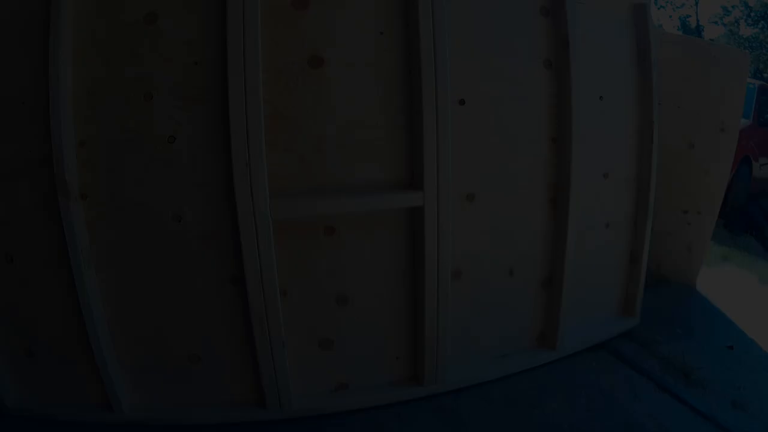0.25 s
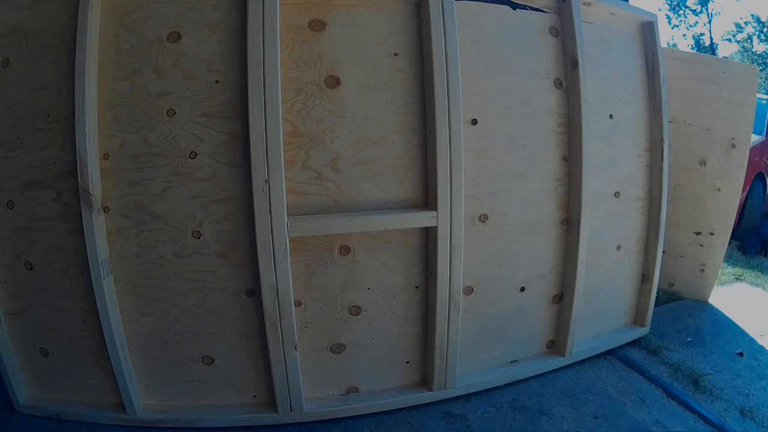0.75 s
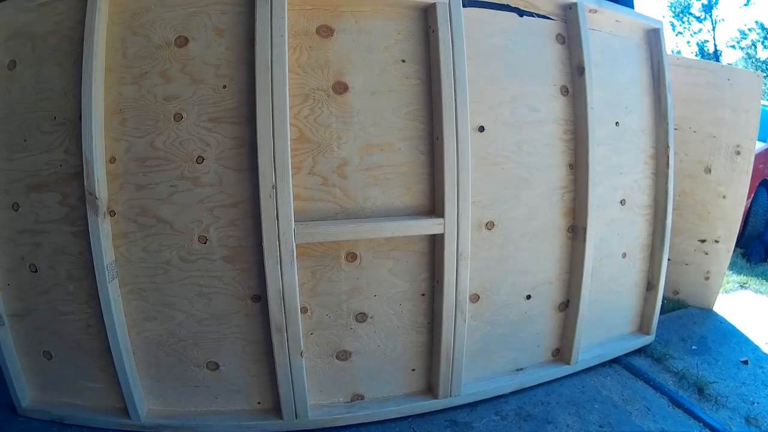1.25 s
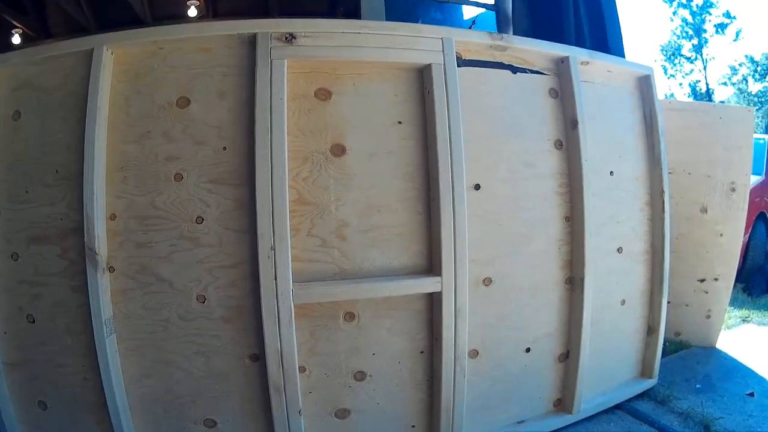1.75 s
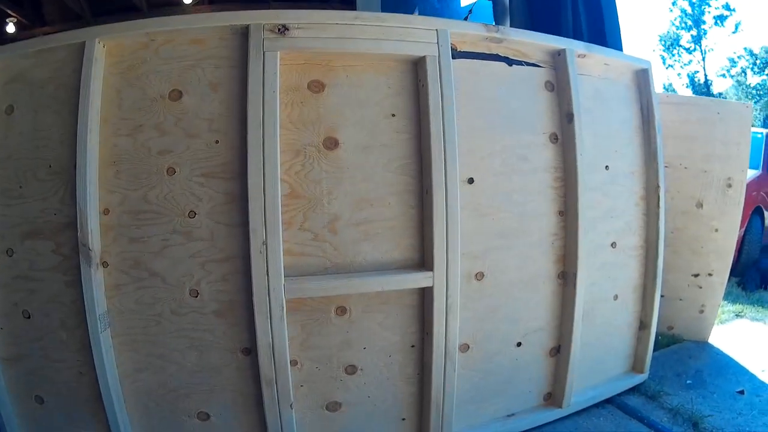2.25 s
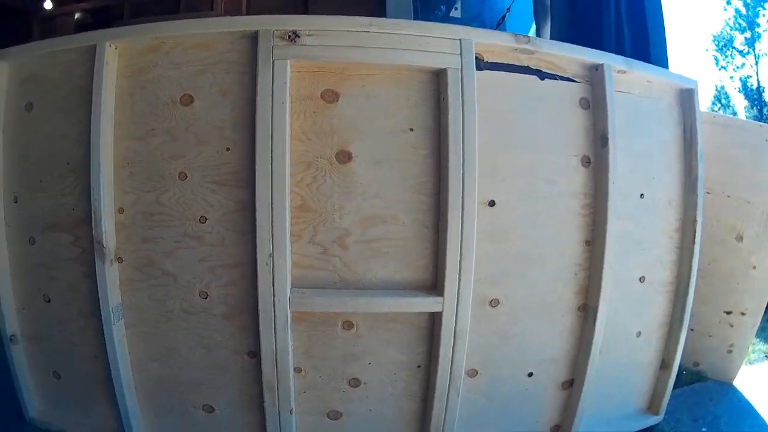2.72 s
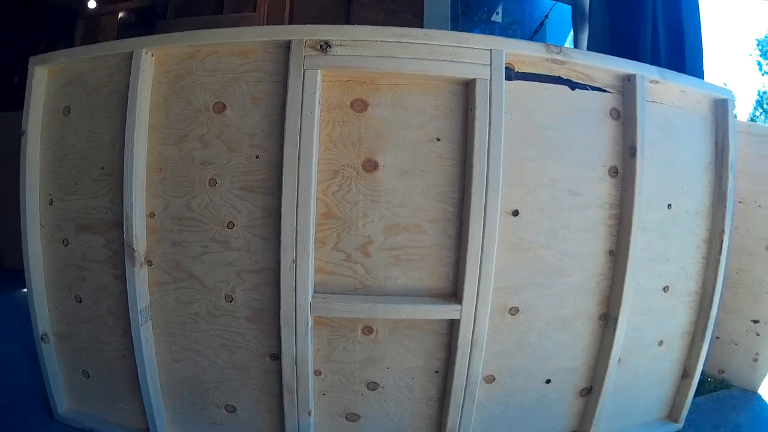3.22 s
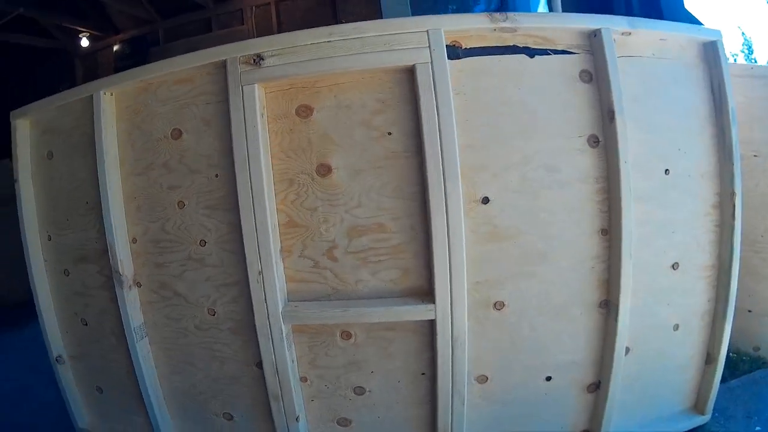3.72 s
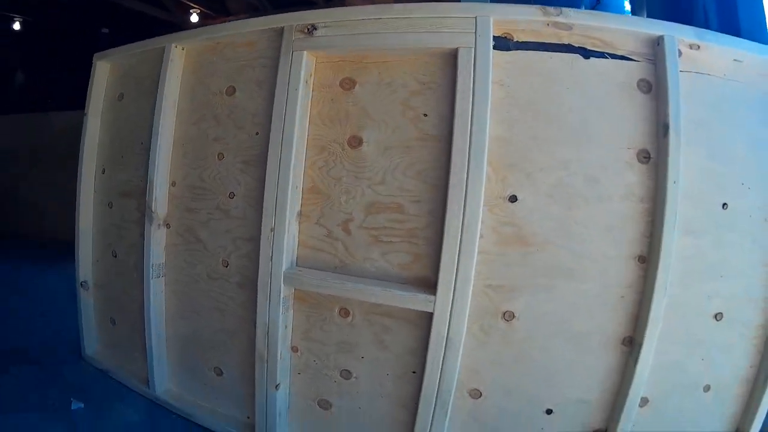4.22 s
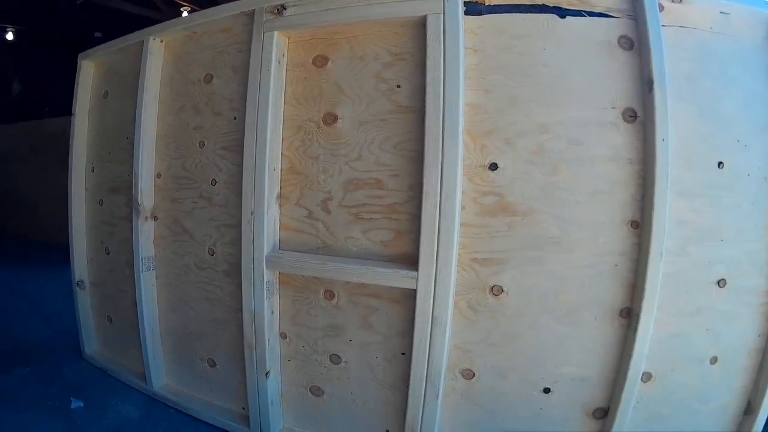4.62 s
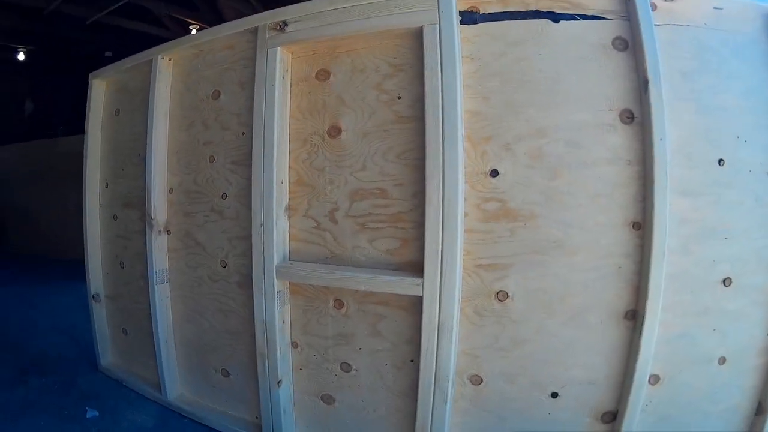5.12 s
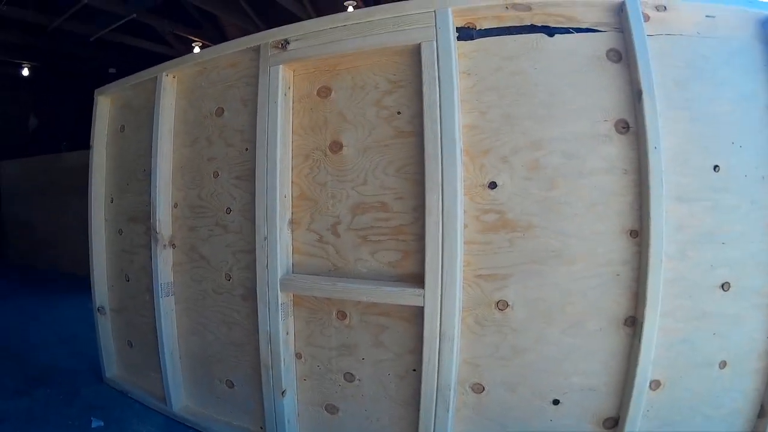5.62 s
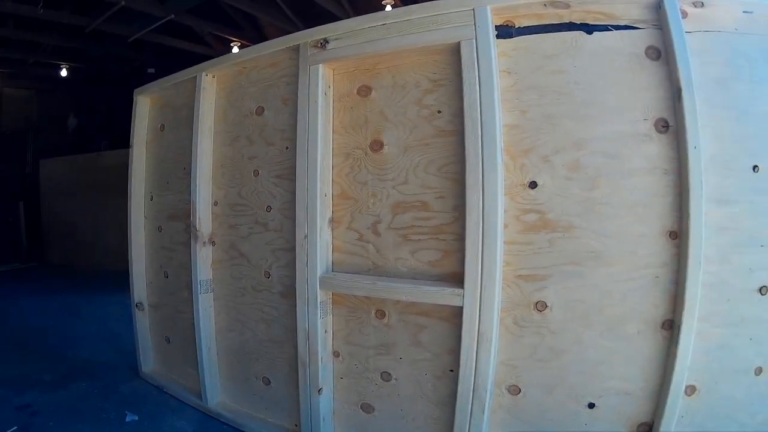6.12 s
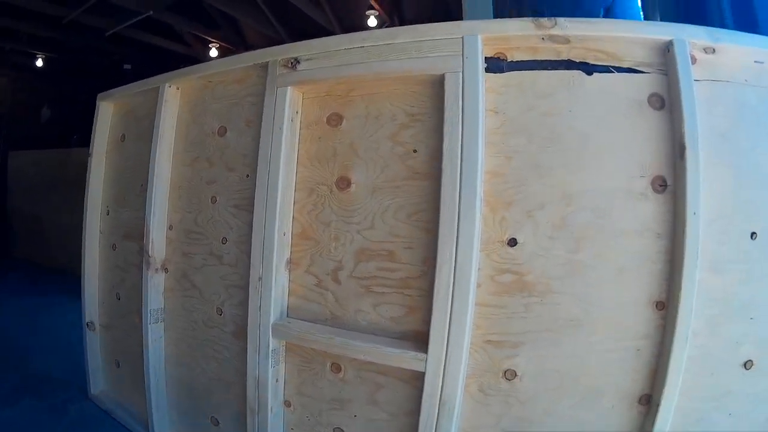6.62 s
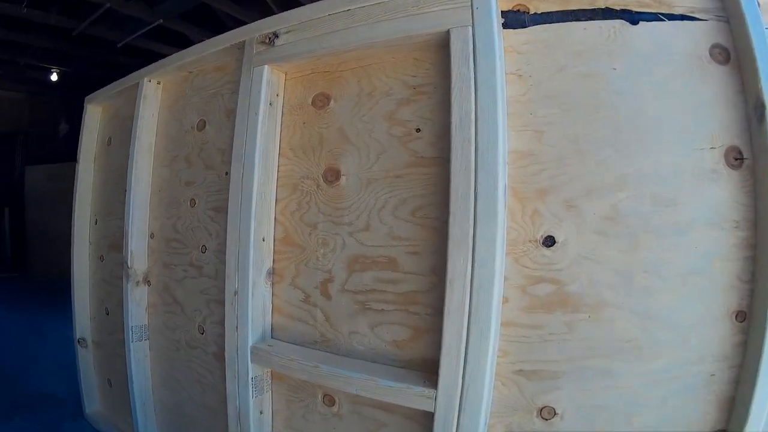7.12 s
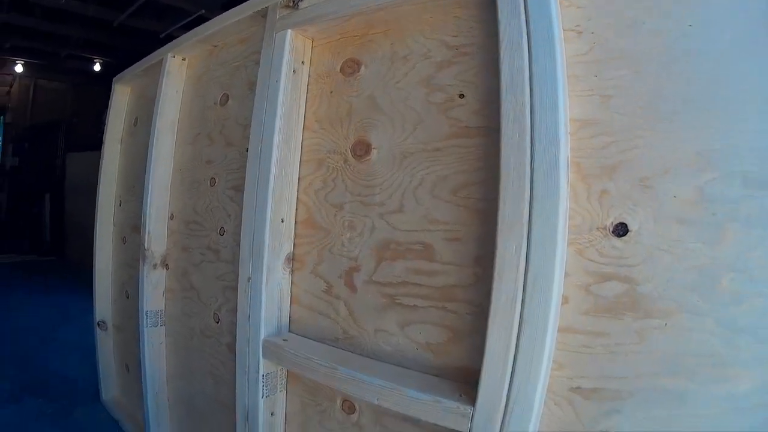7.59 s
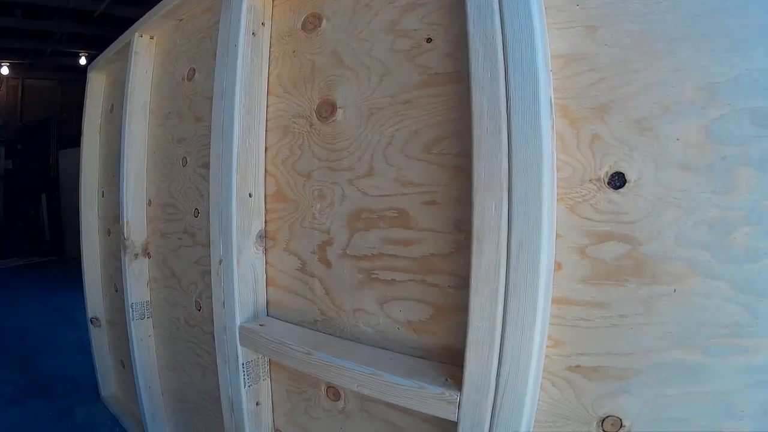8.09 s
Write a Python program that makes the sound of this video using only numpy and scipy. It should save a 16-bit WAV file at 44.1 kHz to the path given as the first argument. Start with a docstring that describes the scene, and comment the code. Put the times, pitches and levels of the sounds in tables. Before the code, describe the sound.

A small camera's plastic housing is knocked, tapped and rubbed in uneven clusters, with heavy close thumps over faint outdoor air and thin hiss.

```python
"""Handling noise of a small camera carried along a plywood wall frame in an open garage, 8.35 s.
0-1.2 s: air, rumble and hiss sink to silence at 0.17 s, then fade in with a thin whine, barely there
before; first knocks and sways.
1.2-2.5 s: dense knocks on the plastic housing, the hardest clipping the input; then sparse, scuffs near 3.9 s.
4.4-6.3 s: knocks, sliding rubs with rattles and mount sways return, one hard blow at 5.86 s.
6.3-8.35 s: light rubs and scuffs over thinner air, then a last cluster of knocks from 7.5 s."""
import sys
import numpy as np
from scipy import signal
from scipy.fft import rfft, irfft
from scipy.io import wavfile

SR = 44100
rng = np.random.default_rng(int(sys.argv[2]) if len(sys.argv) > 2 else 0)


def pcm_store(signal):
    """Save signal as 16-bit PCM."""
    levels = np.round(np.clip(np.atleast_2d(signal), -1, 1) * 32767)
    wavfile.write(sys.argv[1], SR, levels.astype(np.int16).T)


N = 368235

# Outdoor air level, before waver and opening fade: time_s, level_db
AIR_LEVEL = [(1.0, -47), (1.18, -47.5), (1.65, -50.5), (2.41, -48), (2.78, -52.5), (3.95, -53), (4.11, -51),
             (4.79, -46), (5.09, -53), (6.67, -58), (7.06, -62), (7.61, -61.5), (7.84, -56.5),
             (7.94, -57.5), (8.19, -61), (8.35, -67.5)]
# Outdoor air spectrum: freq_hz, density_db (per Hz, relative)
AIR_SPECTRUM = [(20, -18), (60, -0.5), (100, -0.5), (160, -6), (230, 2), (380, -3.5), (650, -5),
                (920, -0.5), (1290, 1.5), (1650, -5), (2300, -13), (3200, -24), (5000, -29.5), (9000, -38)]
# Low rumble spectrum: freq_hz, density_db (per Hz, relative)
RUMBLE_SPECTRUM = [(20, -8.5), (60, -1.5), (100, -1.5), (180, -10.5), (500, -33), (2000, -70)]
# Electronic hiss spectrum: freq_hz, density_db (per Hz, relative)
HISS_SPECTRUM = [(100, 13), (3000, 2.5), (6000, 0.5), (9000, 0), (13000, 1), (15600, -2), (16100, -24.5)]
# Scuff friction spectrum: freq_hz, density_db (per Hz, relative)
SCUFF_SPECTRUM = [(150, -20), (280, -4), (460, 3.5), (800, 3), (1400, 2), (2000, 1), (2600, 0),
                  (4000, -7.5), (6000, -15), (8000, -26), (12500, -16.5), (16000, -30.5)]
# Scuffs, each swelling and dying away: peak_s, level_db, rise_s, fall_s
SCUFF_EVENTS = [(3.83, -61, .02, 0.13), (3.942, -46, 0.017, 0.2), (3.994, -43.5, 0.012, 0.026),
                (6.595, -55, 0.02, 0.04), (7.33, -65.5, 0.1, 0.081)]
# Bumps swaying the mount: start_s, level_db, sway_hz
BUMP_EVENTS = [(0.283, -35.5, 57), (0.392, -39.5, 60), (0.556, -29.5, 60), (.995, -36.5, 85),
               (1.298, -34.5, 127), (1.334, -19, 45.4), (1.551, -18.5, 116.5), (1.56, -30, 47.7),
               (2.001, -39, 69.4), (2.112, -38, 75), (4.455, -26, 66), (4.718, -24, 61), (4.761, -26.5, 72),
               (5.342, -28.5, 64), (5.856, -24.5, 118), (7.63, -24.5, 70), (7.747, -29, 68.4),
               (8.039, -24, 62)]
# Modes of housing and mount, before random spread and heavy damping: freq_hz, level_db, t60_s
HOUSING_MODES = [(143, -12, 0.046), (211, -6.5, 0.066), (289.6, -5.5, 0.069), (401.5, -6, 0.026),
                 (493, -9, 0.021), (605.5, -8, 0.02), (739, -7.5, 0.04), (852.6, 3.5, 0.014),
                 (983, -0.5, 0.017), (1245, -7.5, 0.041), (1447, -9.5, 0.03), (1662, -13, 0.049),
                 (1791, -5.5, 0.031), (2560, -8.5, 0.023), (3130, -16.5, 0.0027), (3683, -9, 0.033),
                 (4770, -4.5, 0.027), (4540, -24, 0.01), (5460, -27.5, 0.012)]
# Grip slides on the case: start_s, length_s, level_db, pitch_hz (favoured by the spot)
RUB_EVENTS = [(0.55, .12, -35.5, 1010), (1.15, .11, -55, 900), (2.118, 0.21, -40.5, 1400),
              (4.45, 0.069, -30, 1200), (4.736, 0.27, -35, 1290), (5.357, .11, -42, 1380),
              (5.86, 0.04, -19.5, 1290), (5.881, 0.16, -38, 1210), (6.576, .15, -39, 614),
              (6.717, 0.054, -45.5, 950), (6.77, .06, -49.5, 870), (7.648, .12, -27, 1570),
              (7.771, 0.087, -35.5, 1490), (8.03, .085, -31, 1090)]
# Stronger rattle taps are sharper: level_db, hardness (0-1)
TAP_HARDNESS = [(-48.5, .25), (-26.5, .65)]
# Knocks on the housing: start_s, level_db, pitch_hz (favoured by the spot),
# hardness (0 flesh - 1 sharp edge), chatter_s (decay)
KNOCK_EVENTS = [(.282, -33.5, 1070, 0.87, 0.0056), (.294, -27.5, 710, .75, 0.0016),
                (0.388, -50.5, 950, 0.89, 0.0059), (0.429, -41.5, 870, .05, 0.012),
                (.564, -35.5, 945, 0.36, 0.00078), (.59, -33, 1410, 0.16, 0.0018),
                (.668, -48.5, 1360, 0.76, .006), (.998, -43.5, 1080, 0.75, .0006),
                (1.011, -41.5, 940, 0.62, 0.0064), (1.166, -28, 1030, 0.52, 0.00045),
                (1.185, -33, 850, .05, 0.00039), (1.207, -38, 717, .06, .0005),
                (1.294, -27.5, 1070, .33, .0006), (1.3035, -13.5, 1060, 0.87, 0.0011),
                (1.323, -19.5, 895, 0.41, .0006), (1.336, -7.5, 1023, 0.83, 0.00086),
                (1.345, -20, 800, 0.3, .0004), (1.541, -34, 870, .05, .0013),
                (1.5513, -9, 650, 0.65, 0.00089), (1.765, -42.5, 800, .1, 0.0048),
                (1.991, -36, 1160, 0.72, 0.0014), (2.037, -42, 960, 0.61, .0006),
                (2.1126, -26, 1030, 0.46, .0005), (2.138, -35, 1140, 0.67, 0.00077),
                (2.19, -33, 1280, 0.31, 0.0038), (2.462, -54, 1800, 0.83, 0.0012),
                (4.461, -35.5, 1080, 0.99, 0.0011), (4.716, -21, 1070, 0.65, 0.00055),
                (4.729, -34, 1220, .62, .0006), (4.777, -26.5, 1280, 0.51, 0.00041),
                (4.816, -34.5, 1090, .25, 0.0033), (5.131, -29, 1200, 0.019, 0.00031),
                (5.345, -45.5, 910, 0.96, 0.0014), (5.361, -37, 1370, 0.52, .0047),
                (5.401, -38.5, 1010, 0.43, .002), (5.681, -49, 950, .45, .0006),
                (5.719, -28, 993, 0.43, 0.0011), (5.837, -30.5, 1000, 0.59, .002),
                (5.856, -11.5, 643, 0.73, 0.00062), (5.92, -32.5, 1560, 0.83, .0006),
                (5.936, -35.5, 1570, 0.72, 0.0044), (6.213, -26, 1170, 0.42, .0004),
                (6.305, -35, 980, .15, 0.0052), (6.685, -45, 1160, 0.6, .0012),
                (6.925, -49, 1100, 0.32, 0.016), (7.476, -30.5, 1222, 0.38, 0.0017),
                (7.626, -32, 836, .75, 0.0042), (7.64, -29.5, 1400, 0.82, .0006),
                (7.652, -31, 1004, 0.58, 0.00066), (7.658, -25, 1350, 0.62, 0.0036),
                (7.674, -28, 1440, .25, .0006), (7.681, -23, 1800, .35, 0.00034),
                (7.703, -27, 1800, .6, 0.00062), (7.75, -40, 790, .97, 0.0016),
                (7.812, -26, 1150, 0.48, 0.00091), (7.899, -47, 1100, .15, .0006),
                (7.96, -46.5, 1400, 0.37, .004), (8.034, -26.5, 790, 0.41, .0006)]

RUMBLE_DB, HISS_DB = -67.5, -73.5
WHINE_HZ, WHINE_DB, WHINE_FADE_S = 6795, -80, 0.46  # the whine's own fade-in, under the opening fade
OPENING_GAIN, SINK_S, FADE_IN_S = 0.54, .17, 1  # background gain at 0 s, time it reaches 0, fade-in after
SWAY_DECAY_S = 0.018
RUB_RISE_S, RUB_FADE_DB = 0.0052, -23.5  # fade over the length of a rub
RATTLE_DB, RATTLE_SPREAD_DB, RATTLE_CHATTER_S = -2.5, 2.5, .001  # dB against the rub
CLACK_SOFT_DB, CLACK_HARD_DB = -28.5, -3.5  # relative to the knock level, flesh to sharp edge
TICK_SOFT_DB, TICK_HARD_DB = -46, -3.5
THUD_DB, THUD_DB_PER_DB = -10.5, -0.18  # at a knock level of -30 dB; light touches thud relatively more
HEAVY_THUD_DB, FLEX_DB = 4, -5  # heaviest blows shake the whole case and flex its walls
CEILING, EDGE_HZ = .7, 16500  # input overload level; band limit


def amp(db):
    """Decibels to gain."""
    return 10 ** (np.asarray(db) / 20)


def add(mix, start_s, sound):
    """Mixes a sound in at start_s, cut at the end of the mix."""
    part = mix[max(round(start_s * SR), 0):][:len(sound)]
    part += sound[:len(part)]


def band(x, lo_hz, hi_hz, order=3):
    """Causal band-pass."""
    sos = signal.butter(order, [lo_hz, min(hi_hz, .48 * SR)], "band", fs=SR, output="sos")
    return signal.sosfilt(sos, x)


def noise(spectrum, lo_hz, hi_hz):
    """Noise of a given spectrum, scaled to rms 1 between lo_hz and hi_hz."""
    hz = np.fft.rfftfreq(N, 1 / SR)
    points_hz, density_db = np.transpose(spectrum)
    shape = amp(np.interp(np.log(hz + 1), np.log(points_hz), density_db))
    bins = rfft(rng.standard_normal(N)) * shape
    in_band = irfft(bins * (hz > lo_hz) * (hz < hi_hz), N)
    return irfft(bins, N) / np.std(in_band)


def wander(rate_hz):
    """Random drift of about unit size: straight lines between rate_hz random points a second."""
    steps = rng.standard_normal(4096)
    return np.interp(np.arange(N) / SR * rate_hz, np.arange(len(steps)), steps)


def curve(time_s, level_db):
    """Level curve as a gain per sample."""
    return amp(np.interp(np.arange(N) / SR, time_s, level_db))


def slips(count, slips_per_s=2200):
    """Tiny random catches between two touching surfaces: sparse random impulses."""
    caught = rng.random(count) < slips_per_s / SR
    return rng.standard_normal(count) * caught


def background(waver_db=1.8):
    """Outdoor air through the open door, steady low rumble, electronic hiss and sine whine."""
    t = np.arange(N) / SR
    air = noise(AIR_SPECTRUM, 300, 2200)
    air *= curve(*np.transpose(AIR_LEVEL)) * amp(waver_db * wander(25))
    rumble = amp(RUMBLE_DB) * noise(RUMBLE_SPECTRUM, 20, 200)
    hiss = amp(HISS_DB) * noise(HISS_SPECTRUM, 7500, 15500)
    whine = amp(WHINE_DB) * np.sqrt(2) * np.sin(2 * np.pi * WHINE_HZ * t)
    whine *= np.minimum(t / WHINE_FADE_S, 1)
    opening = np.interp(t, [0, SINK_S, SINK_S + FADE_IN_S], [OPENING_GAIN, 0, 1])
    return opening * (air + rumble + hiss + whine)


def scuffs(grain_db=1.4, bite_db=3, bite_lo_hz=2100, bite_hi_hz=3700):
    """Dry sliding away from the case: uneven friction noise, rasping where pressure is highest."""
    t = np.arange(N) / SR
    friction = noise(SCUFF_SPECTRUM, 2200, 7000)
    swells = []
    for peak_s, level_db, rise_s, fall_s in SCUFF_EVENTS:
        decay = np.maximum((peak_s - t) / rise_s, (t - peak_s) / fall_s)
        swells.append(amp(level_db) * np.exp(-decay))
    pressure = np.linalg.norm(swells, axis=0)
    rasp = band(slips(N), bite_lo_hz, bite_hi_hz, order=2)
    bite = amp(bite_db) * (pressure / pressure.max()) ** 2 * rasp / np.std(rasp)
    return pressure * amp(grain_db * wander(220)) * (friction + bite)


def bumps(shudder_rms=0.23, shudder_decay_s=0.04):
    """Damped sine sway of the camera on its mount, plus a decaying low-noise shudder."""
    out, t = np.zeros(N), np.arange(SR // 3) / SR
    for start_s, level_db, sway_hz in BUMP_EVENTS:
        swing = np.sin(2 * np.pi * sway_hz * t) * np.exp(-t / SWAY_DECAY_S)
        shudder = band(rng.standard_normal(len(t)), 8, 120, order=2)
        shudder *= shudder_rms / np.std(shudder) * np.exp(-t / shudder_decay_s)
        onset = 1 - np.exp(-t / 0.0048)
        add(out, start_s, amp(level_db) * (swing + shudder) * onset)
    return out


def housing(t, pitch_hz, heavy=0, spot_db=2.5, favour_db=7.5, crack_db=-1, crack_s=0.00066):
    """Case response: damped modes picked by the struck spot, over a brief noise crack."""
    hz, level_db, t60_s = np.transpose(HOUSING_MODES)
    spread, detune, phase = rng.standard_normal((3, len(hz)))
    off_spot = np.tanh(0.74 * abs(np.log2(hz / pitch_hz)))
    # heavy blows reach more modes, and press on the case so its ring is shorter
    gain = amp(level_db + spot_db * spread - favour_db * off_spot * (2 - 0.19 * heavy))
    damping = 1 + 0.48 * heavy
    mode_hz = hz * (1 + 0.028 * detune)
    swing = np.sin(2 * np.pi * mode_hz[:, None] * t + 1.03 * phase[:, None])
    ring = gain @ (swing * amp(-60 * damping * t / t60_s[:, None]))
    crack = amp(crack_db + 5 * heavy) * t / crack_s * np.exp(-t / crack_s)
    crack *= rng.standard_normal(len(t))
    onset = 1 - np.exp(-t / 0.00081)  # the case takes a moment to move
    return ring * onset + crack


def rubs(grain_db=3, grit_db=-19, fizz_db=-27):
    """Sliding grip: clumped slips drive the case modes, with dry grit and fizz on top."""
    out = np.zeros(N)
    clumps = slips(N) * amp(grain_db * wander(260))
    for start_s, length_s, level_db, pitch_hz in RUB_EVENTS:
        t = np.arange(0, length_s, 1 / SR)
        force = clumps[round(start_s * SR):][:len(t)]
        ring = band(housing(np.arange(SR // 8) / SR, pitch_hz), 420, 2400, order=3)
        rasp = signal.fftconvolve(force, ring)[:len(t)]
        grit = band(force, 3300, 4400, order=3)
        fizz = band(force, 5000, 15000, order=2)
        sound = rasp / np.std(rasp)
        sound += amp(grit_db) * grit / np.std(grit)
        sound += amp(fizz_db) * fizz / np.std(fizz)
        envelope = np.minimum(t / RUB_RISE_S, 1) * amp(level_db + RUB_FADE_DB * t / length_s)
        add(out, start_s, envelope * sound)
    return out


def contact(t, chatter_s, slip_size=0.34):
    """Contact force: one impact, then slips dying away as the touching parts settle."""
    force = slip_size * slips(len(t)) * np.exp(-t / max(chatter_s, 1e-4))
    force[0] += np.exp(-chatter_s / 0.0037)  # long chatter has little first impact
    return force


def edge_tick(t, chatter_s, level_db, tick_s=0.00025, fizz_db=-29, fizz_s=0.0059):
    """Hard edge snap: ringless noise pulse and faint fizz; chatter lengthens it, heavy blows are duller."""
    length_s = tick_s + 0.15 * max(chatter_s, 0)
    shape = t / length_s * np.exp(-t / length_s) + amp(fizz_db) * np.exp(-t / fizz_s)
    top_hz = np.interp(level_db, [-32, -20], [16000, 13000])
    return band(shape * rng.standard_normal(len(t)), 6500, top_hz, order=3)


def unit_blow(x):
    """Scales a blow to the energy of 10 ms at rms 1."""
    return x / np.sqrt(np.sum(x ** 2) / (SR / 100) + 1e-20)


def knock(level_db, pitch_hz, hardness, chatter_s, body_db=-0.5, buzz=0.021, buzz_s=0.0047):
    """Soft flesh thuds, plastic on plastic clacks, a hard edge ticks; thud, body and clack share one ring."""
    t = np.arange(SR // 8) / SR
    hardness = np.clip(hardness, 0, 1)
    heavy = np.interp(level_db, [-24, -10], [0, 1])
    thud_db = THUD_DB + THUD_DB_PER_DB * (level_db + 30) + HEAVY_THUD_DB * heavy
    clack_db = CLACK_SOFT_DB + (CLACK_HARD_DB - CLACK_SOFT_DB) * hardness
    tick_db = TICK_SOFT_DB + (TICK_HARD_DB - TICK_SOFT_DB) * hardness ** 2
    ring = signal.fftconvolve(contact(t, chatter_s), housing(t, pitch_hz, heavy))[:len(t)]
    # loose parts buzz on after the blow
    loose = buzz * rng.standard_normal(len(t)) * np.exp(-t / buzz_s)
    buzzing = ring + signal.fftconvolve(loose, ring)[:len(t)]
    sound = amp(body_db) * unit_blow(band(ring, 590, 2250, order=3))
    sound += amp(thud_db) * unit_blow(band(ring, 110, 520, order=4))
    sound += heavy * amp(FLEX_DB) * unit_blow(band(ring, 390, 560, order=2))
    sound += amp(clack_db) * unit_blow(band(buzzing, 2350, 5450, order=4))
    sound += amp(tick_db) * unit_blow(edge_tick(t, chatter_s, level_db))
    return amp(level_db) * sound


def rattles(count=3):
    """Loose parts: each slide shakes off small taps at random moments, tending weaker as it eases off."""
    out = np.zeros(N)
    for start_s, length_s, level_db, pitch_hz in RUB_EVENTS:
        positions = (np.arange(count) + rng.random(count)) / count  # fractions of the slide
        for along, chance in zip(positions, rng.standard_normal(count)):
            tap_db = level_db + RUB_FADE_DB * along + RATTLE_DB + RATTLE_SPREAD_DB * chance
            hardness = np.interp(tap_db, *np.transpose(TAP_HARDNESS))
            tap = knock(tap_db, pitch_hz, hardness, RATTLE_CHATTER_S)
            add(out, start_s + along * length_s, tap)
    return out


def knocks():
    """Distinct knocks of fingers and mount, each striking the case modes."""
    out = np.zeros(N)
    for start_s, level_db, pitch_hz, hardness, chatter_s in KNOCK_EVENTS:
        add(out, start_s, knock(level_db, pitch_hz, hardness, chatter_s))
    return out


def garage(x, t60_s=0.23, wet_db=-37):
    """Faint diffuse tail by noise convolution: most of each knock reaches the microphone through the case."""
    t = np.arange(SR // 2) / SR
    tail = band(rng.standard_normal(len(t)), 100, 3500, order=1)
    tail *= amp(-60 * t / t60_s) * (1 - np.exp(-t / .008))
    return amp(wet_db) * signal.fftconvolve(x, tail / np.linalg.norm(tail))[:N]


def scene():
    """Handling noises over the background, mono."""
    handling = knocks() + rubs() + rattles()
    mix = handling + garage(handling) + bumps() + scuffs() + background()
    return mix[None]


def record(dry):
    """Input overload clips the hardest knocks; a linear-phase low-pass then limits the band."""
    clipped = np.clip(dry, -CEILING, CEILING)
    lowpass = signal.firwin(401, EDGE_HZ, window=("kaiser", 9), fs=SR)
    return signal.oaconvolve(clipped, lowpass[None], "same")


dry = scene()
out = record(dry)
pcm_store(out)
```